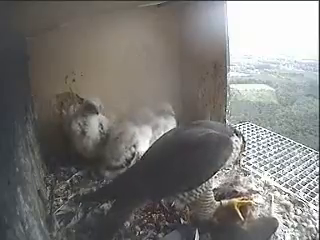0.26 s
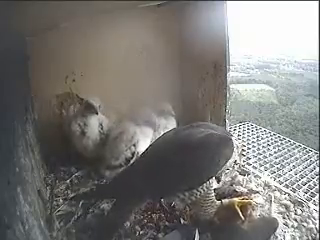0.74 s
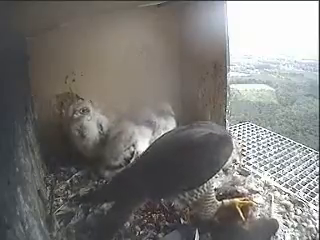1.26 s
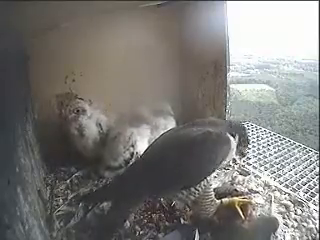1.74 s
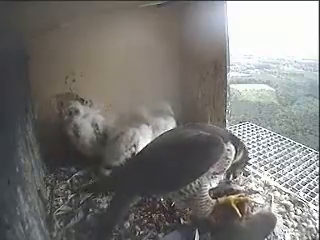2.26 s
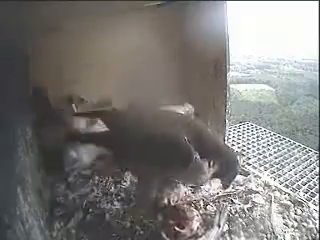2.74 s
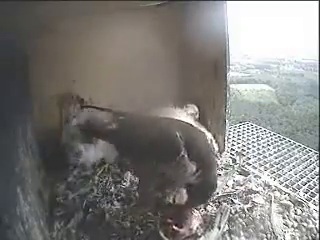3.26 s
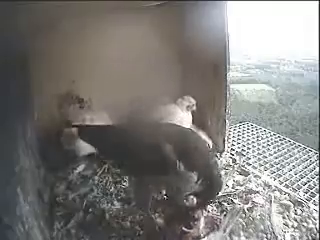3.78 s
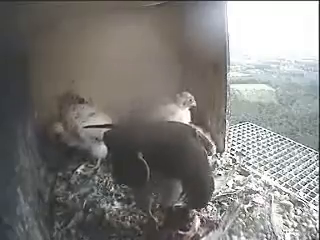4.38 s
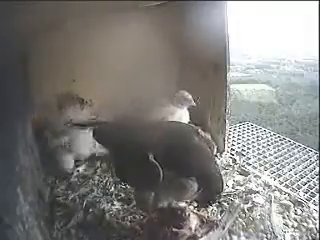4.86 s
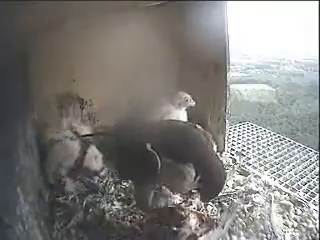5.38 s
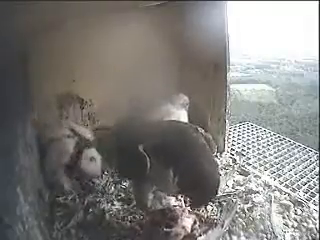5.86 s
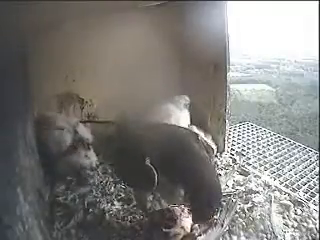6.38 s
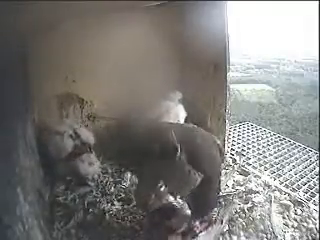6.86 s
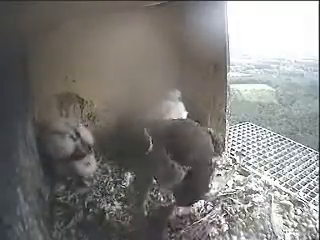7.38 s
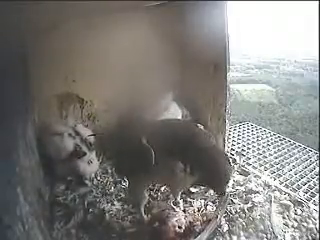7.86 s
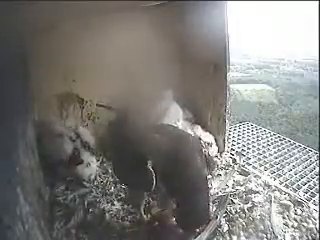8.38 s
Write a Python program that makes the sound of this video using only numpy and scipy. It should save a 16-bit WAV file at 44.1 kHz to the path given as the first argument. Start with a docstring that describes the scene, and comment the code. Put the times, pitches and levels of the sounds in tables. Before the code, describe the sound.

A fixed microphone inside a hollow nest box picks up quiet air, faint electrical hum and high whine. Young falcons cheep, thinly and clearly at first, then harsh and louder in quick runs as the adult feeds. Feet tread and scrape gravel, the beak ticks and snaps, prey bumps the boards. A few low soft peeps slide downward later. Close walls add short flutter and woody resonance; the calls become sparse near the end.

```python
"""Air murmurs in a wooden nest box over a faint electrical hum and whine, and feet shuffle on gravel.
Falcon chicks soon beg: most cheeps start as a rising whistle, break into a hoarse rasp and clear as they fall.
A parent tears at prey: beak and gravel snap as short noise bursts, feet and prey thump on the floor.
Voices are sums of sine waves plus hiss; the rest is shaped noise; resonances and short echoes make the box.
A few soft, low peeps slide down in pitch in the second half."""
import sys
import numpy as np
from scipy import signal
from scipy.fft import rfft, irfft, next_fast_len
from scipy.io import wavfile

SR = 44100
rng = np.random.default_rng(int(sys.argv[2]) if len(sys.argv) > 2 else 0)


def put_to_file(sound):
    """Save the sound as 16-bit audio at rate SR, in the file named by the first command-line argument."""
    columns = np.atleast_2d(sound).T  # one column per channel
    safe = np.clip(columns, -1, 1)
    whole_steps = np.round(safe * 32767)
    wavfile.write(sys.argv[1], SR, whole_steps.astype(np.int16))


N = 380577
T = np.arange(N) / SR  # time in seconds

# hiss of a hoarse throat, as a spectrum shape: frequency_hz, relative_level_db (per Hz)
RASP_SPECTRUM = [(400, -48), (1100, -5.5), (2150, -16.5), (2450, -6.5), (3200, 2), (3550, 0), (4000, 3.5),
                 (5400, -1), (6100, -8.5), (7300, 1.5), (8500, -3), (9700, -2.5), (10700, -28),
                 (13000, -41)]
# hard clack of stones or wood, as a spectrum shape: frequency_hz, relative_level_db (per Hz)
CLACK_SPECTRUM = [(200, -36), (600, -13), (1100, 5), (1900, 1), (3200, 4), (5000, -6), (10000, -18)]
# feet and prey strike the floor: start_s, relative_level_db, hardness_db (clack against thud)
FLOOR_HITS = [(2.707, -44.5, 1), (2.734, -44, -12), (2.782, -51.5, 16.5), (2.882, -37, -18),
              (3.362, -43, -13), (3.774, -50.5, 11), (4.128, -37.5, 0.5), (4.289, -42, -10),
              (4.386, -49, 4.5), (4.638, -39.5, 2), (4.84, -41.5, -12), (4.925, -45, 3), (4.95, -45.5, 6),
              (4.996, -42, 10), (5.172, -38, -14), (5.557, -38, -8.5), (5.868, -28.5, -30),
              (5.899, -47, -23), (6.216, -32.5, -21), (6.658, -41.5, -21), (6.978, -39, 0),
              (7.106, -38.5, -13), (8.002, -45.5, -1), (8.352, -39, -1), (8.469, -45.5, 6.5)]


def amp(db):
    """Turns decibels into an amplitude factor."""
    return 10 ** (np.asarray(db) / 20)


def unit(x):
    """Scales a sound to an average (rms) level of 1."""
    return x / np.sqrt(np.mean(x ** 2) + 1e-20)


def add(mix, s, sound):
    """Adds a sound into the mix at s seconds, cut off at the end of the mix."""
    part = mix[max(round(s * SR), 0):][:len(sound)]
    part += sound[:len(part)]


def bump(t, at_s, width_s):
    """A smooth swell of height 1."""
    return np.exp(-((t - at_s) / width_s) ** 2)


def colour(x, points):
    """Filters x through a curve drawn between (Hz, dB) points, then sets its rms to 1."""
    hz, db = np.transpose(points)
    f = np.fft.rfftfreq(len(x), 1 / SR)
    curve_db = np.interp(np.log(f + 1), np.log(hz), db)
    return unit(irfft(rfft(x) * amp(curve_db), len(x)))


def wander(rate_hz):
    """Random motion of rms 1, mostly slower than rate_hz."""
    size = next_fast_len(N)
    f = np.fft.rfftfreq(size, 1 / SR)
    smoothed = rfft(rng.standard_normal(size)) / np.sqrt(1 + (f / rate_hz) ** 4)
    return unit(irfft(smoothed, size)[:N])


def noise(points):
    """Steady noise with a given spectrum, as long as the scene."""
    return colour(rng.standard_normal(next_fast_len(N)), points)[:N]


def grains(points, per_s, spread_db):
    """Many tiny impacts of uneven size at random moments."""
    size = next_fast_len(N)
    hits = (rng.random(size) < per_s / SR) * rng.choice([-1, 1], size)
    sizes_db = spread_db * np.minimum(rng.exponential(1, size), 4)
    return colour(hits * amp(sizes_db), points)[:N]


def burst(source, s, decay_s, rise_s):
    """A piece of noise that swells quickly and dies away."""
    t = T[:SR // 8]
    return source[round(s * SR):][:len(t)] * (1 - np.exp(-t / rise_s)) * np.exp(-t / decay_s)


def box(x):
    """The air and boards of the box ring at their own pitches, with dips between them."""
    # resonances of the box: centre_hz, width_hz, ring_level_db (over the direct sound)
    modes = [(90.7, 25, 12.5), (218.8, 33.7, 10), (252.4, 10.6, 11.5), (670.3, 25.5, 13.5), (968, 45, 8.5),
             (1131, 76, 9), (1260, 31, 6), (1576, 36, 5.5), (1899, 57, 8.5), (2380, 8.3, -14),
             (2633, 47, 3.5), (3000, 60, -30), (3836, 18, 3.5), (4214, 98, -1.5), (4994, 32, -7),
             (5057, 82, 1), (5285, 28, 7)]
    # places where wall echoes cancel at the microphone: centre_hz, width_hz, depth_db
    dips = [(1368, 100, -4.5), (1612, 54, -11.5), (2180, 112, -14.5), (5900, 250, -2.5)]
    out = x.copy()
    for hz, width, db in modes:
        out += amp(db) * signal.lfilter(*signal.iirpeak(hz, hz / width, SR), x)
    for hz, width, db in dips:
        out += (amp(db) - 1) * signal.lfilter(*signal.iirpeak(hz, hz / width, SR), out)
    return out


def walls(x, wet_db=-6, t60=0.11):
    """Close walls throw back a short dense flutter of echoes that fades by 60 dB in t60 seconds."""
    t = T[:SR // 5]
    signs = rng.choice([-1, 1], len(t))
    chosen = rng.random(len(t)) < 1 / 10
    taps = signs * chosen * (t > .0015) * amp(-60 * t / t60)  # no echo in the first 1.5 ms
    echoes = signal.oaconvolve(x, taps / np.linalg.norm(taps))[:N]
    return (x + amp(wet_db) * echoes) / np.hypot(1, amp(wet_db))


def outside(level_db=-60, swell_db=1):
    """Distant air sounds in the hollow of the box: shaped noise that slowly swells and sinks."""
    # outside air and hiss, as a spectrum shape: frequency_hz, relative_level_db (per Hz)
    air_spectrum = [(15, 10.5), (45, 5), (130, -12), (330, -17.5), (800, -15), (1500, -17), (2200, -18),
                    (2600, -14), (4200, -17.5), (6000, -21), (10400, -46), (11000, -33), (13000, -43)]
    return amp(level_db) * unit(box(noise(air_spectrum))) * amp(swell_db * wander(2.2))


def shuffling(tread_db=1, scrape_db=8, lumps_db=1.5, steps_db=1.57, steps_hz=5):
    """Feet work the floor while gravel and feathers scrape, in uneven steps and more after each knock."""
    # how busily the parent shuffles: time_s, weight_db (on the floor), scraping_db (both before a trim)
    activity = [(0.0, -59, -78), (0.45, -63, -81), (0.72, -62, -86), (2.68, -60.5, -82),
                (2.85, -55.5, -63.5), (3.16, -57.5, -81), (3.57, -54.5, -67.5), (4.07, -54.5, -74.5),
                (4.31, -51, -63), (4.5, -53.5, -65.5), (5.01, -49.5, -62.5), (5.27, -54, -69.5),
                (6.49, -55.5, -70.5), (7.02, -51.5, -66), (7.66, -56, -76), (7.88, -55.5, -64),
                (8.12, -59, -81.5), (8.6, -56.5, -80)]
    # feet on the floor, as a spectrum shape: frequency_hz, relative_level_db (per Hz)
    tread_spectrum = [(25, -18), (90, 1.5), (200, 8), (330, -4), (600, -1.5), (1200, -16), (2000, -19.5),
                      (4000, -25.5)]
    # gravel and feathers, as a spectrum shape: frequency_hz, relative_level_db (per Hz)
    scrape_spectrum = [(300, 5), (1200, -3.5), (2200, 0.5), (2700, 2), (5000, -1.5), (7200, 3.5),
                       (10200, 5.5), (11200, -8.5), (13000, -10)]
    # each knock stirs the litter, which takes a moment to settle
    stir_rise_s, stir_fall_s, stir_tread_db, stir_scrape_db = .012, 0.029, -12.5, -20
    s, weight_db, gravel_db = np.transpose(activity)
    stir, t = np.zeros(N), T[:SR // 2]
    for knock_s, db, _ in FLOOR_HITS:
        add(stir, knock_s, amp(db) * (1 - np.exp(-t / stir_rise_s)) * np.exp(-t / stir_fall_s))
    tread = unit(box(grains(tread_spectrum, per_s=700, spread_db=2.0)))
    scrape = box(grains(scrape_spectrum, per_s=3700, spread_db=-3.5))
    scrape = unit(scrape * amp(lumps_db * wander(25)))
    weight = np.hypot(amp(np.interp(T, s, weight_db) + tread_db), amp(stir_tread_db) * stir)
    gravel = np.hypot(amp(np.interp(T, s, gravel_db) + scrape_db), amp(stir_scrape_db) * stir)
    return (tread * weight + scrape * gravel) * amp(steps_db * wander(steps_hz))


def whistle(phase, dull_db=0):
    """The clear voice: a few harmonics, each dull_db weaker than usual against the one below."""
    # lines of the voice: multiple_of_pitch, relative_level_db
    partials = [(1, -4.5), (2, -8.5), (3, -11.5), (4, -43)]
    return sum(amp(db - dull_db * (k - 2)) * np.sin(round(k) * phase) for k, db in partials)


def cheep_pitch(t, left, first_hz, top_hz, whistle_s):
    """The pitch in Hz rises toward a top, then drops toward a closing pitch shared by all cheeps."""
    rise_s, fall_s, last_hz, creep_per_s = .03, 0.02, 2405, .3
    rise = (first_hz - top_hz) * np.exp(-t / rise_s)
    fall = (last_hz - top_hz) * np.exp(-left / fall_s)
    # a long whistle creeps upward
    return (top_hz + rise + fall) * (1 - creep_per_s * np.maximum(whistle_s - t, 0))


def chicks(break_s=0.018, breath_db=-27, flutter_db=3, sag=.035, climb=0.19, climb_s=0.032,
           choke_db=-9.0, split_db=1.5, break_share=0.32):
    """Each cheep arches in pitch; pushed hard, the syrinx jitters, splits into two tones and hisses."""
    # one row a cheep: start_s, end_s, first_hz, top_hz, whistle_s (clear before the break),
    # roughness (about 0.6 to 1.1), level_db (before effort and mix), push_at_s (time in the scene),
    # push_db, flare_db (closing swell or, if negative, dip), treble_db (boost or cut)
    cheep_rows = [ (0.22, 0.48, 2080, 2544, 0.026, .6, -55.5, .37, 1, 1, 1),
                  (.608, 0.967, 2280, 2845, 0.19, 0.91, -57, .705, 3, 4, -3),
                  (1.096, 1.22, 2350, 3110, 0.035, 0.77, -58, 1.17, 2.5, 7, -0.5),
                  (1.302, 1.406, 2420, 3060, 0.036, 0.85, -57, 1.37, 2, 5.5, -0.5),
                  (1.511, 1.647, 2400, 3014, 0.038, 0.86, -55.5, 1.59, 1.5, 3, -1.5),
                  (1.82, 2, 2450, 3105, 0.034, 0.8, -56, 1.92, 2, 9, 2.5),
                  (2.13, 2.257, 2420, 3110, .038, 0.75, -55.5, 2.23, 2, 4, -0.5),
                  (2.379, 2.498, 2450, 3070, 0.027, 0.81, -57, 2.45, 4, 2, 0),
                  (2.63, 2.79, 2420, 2722, 0.024, 0.67, -57.5, 2.757, 19.5, 3.5, .5),
                  (3.345, 3.458, 2350, 2784, .021, .87, -51, 3.385, 5.5, -1.5, -3),
                  (3.577, 3.674, 2400, 2740, 0.0063, .89, -56.5, 3.63, 6, -0.5, 4.5),
                  (3.716, 3.781, 2450, 2650, .006, 0.89, -55, 3.745, 5.5, -2.5, 0),
                  (4.125, 4.246, 2550, 2724, .003, 1.1, -50.5, 4.21, 0.5, 5, 4),
                  (4.419, 4.52, 2450, 2860, 0.0068, 0.92, -56.5, 4.478, 10, -3, -1),
                  (4.644, 4.901, 2450, 3045, .011, 1.06, -45.5, 4.69, 1.5, -12, -3),
                  (5.006, 5.155, 2450, 2720, 0.0044, 0.95, -46, 5.06, 2.5, -4.5, -3),
                  (5.253, 5.467, 2480, 2683, 0.0099, 0.84, -51, 5.355, 10.5, -4.5, -1.5),
                  (5.566, 5.913, 2400, 2738, 0.01, 0.76, -48.5, 5.65, 7, -2, -3),
                  (5.877, 6.088, 2450, 2570, .005, .72, -47.5, 5.99, 2.5, 6.5, -0.5),
                  (6.136, 6.421, 2454, 2864, 0.05, 0.66, -50.5, 6.32, 8.5, 10.5, -2.5),
                  (6.457, 6.594, 2380, 3016, .04, .63, -51.5, 6.56, 3, 6.5, -1),
                  (6.588, 6.718, 2550, 2820, .003, 0.71, -52, 6.65, 6, 10, -0.5),
                  (6.714, 6.864, 2450, 3003, 0.036, 0.6, -49, 6.77, 4.5, 6.5, -1.5),
                  (6.872, 6.941, 2500, 2610, 0.0058, 0.7, -50.5, 6.895, 7.5, 2, -2),
                  (6.943, 7.007, 2500, 2687, 0.0086, 0.64, -51, 6.995, 9.5, 3.5, 1.5),
                  (7.571, 7.677, 2350, 2786, 0.014, 0.79, -52, 7.6, 3.5, -6, 2.5),
                  (7.809, 7.892, 2450, 2750, 0.0038, 0.92, -56.5, 7.85, 3.5, -2, 3.5),
                  (7.938, 8.003, 2450, 2640, 0.0034, 0.91, -58, 7.96, 5.5, -1.5, -1.5),
                  (8.352, 8.477, 2500, 2665, 0.0021, 1.03, -50, 8.44, 2.5, -5, 2.5)]
    # second tone and its sums with the first: multiple_of_pitch_added, relative_level_db
    split_partials = [(0, -9.5), (1, -13), (2, -18.5)]
    # a higher cheep has a higher, stronger second tone and a steadier pitch
    usual_top_hz, base_second_hz, second_follows, second_hz_per_db = 2792, 4188, .35, 114
    usual_warble, warble_fade_hz = 0.0202, 425  # warble as a share of pitch
    # loud cheeps never come fully clear: they keep a share of the rasp
    clear_below_db, rasp_share_per_db, most_rasp_share = -56, .11, .52
    rasp_db, end_rough, clear_s = -8.5, .25, .032
    closing_strain, strain_dull_db = .7, 3
    # effort: an accent on the opening whistle, one broad push, a flare just before the beak shuts
    accent_db, accent_at_s, accent_width_s = 2, 0.017, 0.021
    push_width_s, flare_before_end_s, flare_width_s = 0.044, 0.017, 0.016
    throb_db, throb_hz, gate_s = 1.0, 11, 0.01
    full_voice_hz, weak_hz_per_db = 2504, 51  # the voice weakens below this pitch

    out = np.zeros(N)
    jitter, second_jitter = .12 * wander(300), .033 * wander(300)
    slow, flutter, throb, hiss = wander(50.5), wander(62), wander(throb_hz), noise(RASP_SPECTRUM)
    for (start, end, first_hz, top_hz, whistle_s, roughness, level_db,
         push_at, push_db, flare_db, treble_db) in cheep_rows:
        at = slice(round(start * SR), round(end * SR))
        t, left = T[at] - start, np.maximum(end - T[at], 0)
        pitch = cheep_pitch(t, left, first_hz, top_hz, whistle_s)

        # the voice breaks after the whistle and clears as the pressure drops, unless it is very hoarse
        strain = np.clip((level_db - clear_below_db) * rasp_share_per_db, 0, most_rasp_share)
        closing = end_rough + closing_strain * strain + roughness ** 8
        held = np.clip(closing + (left / clear_s) ** 3 / 2, 0, 1)
        breaking = np.clip((t - whistle_s) / (break_s + break_share * whistle_s) + .5, 0, 1)
        broken = breaking * held
        rough = np.clip(roughness, 0, 1) * (broken + strain * (1 - broken))

        # roughness shakes the pitch and pulls it down
        warble = usual_warble * np.exp((usual_top_hz - top_hz) / warble_fade_hz)
        shake = rough ** 2 * jitter[at] + warble * np.maximum(broken, strain) * slow[at]
        phase = 2 * np.pi * np.cumsum(pitch * (1 + shake - sag * rough)) / SR

        # a second vibration climbs after the break and takes power from the first
        still_low = climb * min(whistle_s / break_s, 1) * np.exp(-np.maximum(t - whistle_s, 0) / climb_s)
        arch = np.sqrt(pitch / top_hz) * (1 - still_low)
        second_hz = base_second_hz * (top_hz / usual_top_hz) ** second_follows * arch
        second_phase = 2 * np.pi * np.cumsum(second_hz * (1 + roughness * second_jitter[at])) / SR
        split = sum(amp(db) * np.sin(second_phase + round(k) * phase) for k, db in split_partials)
        split = split * amp((top_hz - usual_top_hz) / second_hz_per_db)

        # clear tone, second tone and hiss together, fluttering where the voice is rough
        voice = whistle(phase, strain_dull_db * strain) * amp(choke_db * rough)
        voice = voice + np.sqrt(2) * rough ** 2 * split * amp(split_db + choke_db * rough ** 2)
        voice = voice + (amp(rasp_db) * np.sqrt(2) * rough ** 2 + amp(breath_db)) * hiss[at]
        voice = unit(voice * amp(flutter_db * rough * flutter[at]))
        # a wider gape lets out more treble
        treble = signal.filtfilt(*signal.butter(2, 6000, "high", fs=SR), voice)
        voice = voice + (amp(treble_db) - 1) * treble

        effort_db = level_db + accent_db * (1 - broken) * bump(t, accent_at_s, accent_width_s)
        effort_db = effort_db + push_db * bump(T[at], push_at, push_width_s)
        effort_db = effort_db + flare_db * bump(left, flare_before_end_s, flare_width_s)
        effort_db = effort_db + throb_db * rough * throb[at]
        effort_db = effort_db - np.maximum(full_voice_hz - pitch, 0) / weak_hz_per_db
        gate = np.clip(np.minimum(t, left) / gate_s, 0, 1)  # soft start and end
        add(out, start, voice * gate * amp(effort_db))
    return out


def ticks(level_db=-3, decay_s=0.0049, clack_db=-10):
    """Beak and gravel snap: short bright noise bursts, each with some woody body under it."""
    # snaps: time_s, relative_level_db, body_db (low-mid body against the treble, before a trim)
    snap_rows = [(1.0854, -46, -16), (1.7145, -54, -8), (1.9624, -36.5, -1), (2.1312, -40, -4),
                 (2.6666, -41, 2), (2.71, -45, 2), (2.878, -28, -0.5), (3.116, -45.5, -6), (3.325, -41, -7),
                 (3.49, -40.5, 1), (3.777, -32.5, -9), (3.8266, -40.5, 4), (4.1211, -31, -20),
                 (4.135, -26.5, -31), (4.2961, -34.5, -13), (4.3777, -34, -17), (4.999, -37.5, -10),
                 (5.466, -42.5, -10), (5.5562, -36.5, -13), (5.855, -34, -19), (7.044, -40, 3.5),
                 (7.086, -34.5, -16), (7.1036, -31, 0), (7.313, -38, -13), (7.45, -38, -3),
                 (7.614, -35.5, -23), (7.9958, -36, 6), (8.3413, -36, 1), (8.3567, -29, -19)]
    # bright part of a snap, as a spectrum shape: frequency_hz, relative_level_db (per Hz)
    snap_spectrum = [(500, -1.5), (2000, -29.5), (4500, -14.5), (6000, -2.5), (7100, 1), (8200, -3),
                     (10200, 3.5), (11000, -11), (12500, -10)]
    out, snap, clack = np.zeros(N), noise(snap_spectrum), noise(CLACK_SPECTRUM)
    rise_s = .0025
    for s, db, body_db in snap_rows:
        bright = burst(snap, s, decay_s, rise_s)
        body = amp(body_db + clack_db) * burst(clack, s, decay_s, rise_s)
        add(out, s - rise_s / 2, amp(db + level_db) * (bright + body))
    return out


def knocks(thud_db=-1, clack_db=-11, decay_s=0.015, rise_s=0.00024, push_s=0.00048,
           settle_db=-13, settle_s=0.029):
    """A soft push on the boards and a low settling noise, with a clack of stones on top."""
    # low settling noise, as a spectrum shape: frequency_hz, relative_level_db (per Hz)
    thud_spectrum = [(30, -18), (100, -4), (200, 13), (300, 7.5), (450, -41), (900, -43), (2500, -43)]
    out, clack, settle = np.zeros(N), noise(CLACK_SPECTRUM), noise(thud_spectrum)
    u = T[:SR // 8] / push_s
    push = u * (2 - u) * np.exp(-u)  # the boards give, then spring back
    for s, db, hard_db in FLOOR_HITS:
        thud = push + amp(settle_db) * burst(settle, s, settle_s, rise_s)
        stones = amp(clack_db + hard_db) * burst(clack, s, decay_s, rise_s)
        add(out, s, amp(db) * (amp(thud_db) * thud + stones))
    return out


def peeps(attack_s=0.0077, release_s=0.017, fade_db=-5, waver=0.024, jitter=0.039, hiss_db=-5):
    """Short soft notes of the same voice that slide down and fade."""
    # one row a peep: start_s, end_s, first_hz, last_hz, level_db (before fade and mix), roughness (0-1)
    peep_rows = [(4.276, 4.438, 2400, 2090, -57, 0.3), (7.085, 7.217, 1984, 1853, -62, 0.23),
                 (8.482, 8.521, 2130, 1910, -56, 0.65), (8.541, 8.584, 2240, 1825, -52.5, 0.73)]
    out, slow, fast, hiss = np.zeros(N), wander(62), wander(300), noise(RASP_SPECTRUM)
    for start, end, first_hz, last_hz, level_db, roughness in peep_rows:
        at = slice(round(start * SR), round(end * SR))
        t, left = T[at] - start, end - T[at]
        done = t / (end - start)  # 0 at the start of the note, 1 at its end
        shake = waver * slow[at] + jitter * roughness * fast[at]
        hz = (first_hz + (last_hz - first_hz) * done) * (1 + shake)
        tone = whistle(2 * np.pi * np.cumsum(hz) / SR)
        voice = unit(tone + amp(hiss_db) * roughness * hiss[at])
        gate = np.clip(np.minimum(t / attack_s, left / release_s), 0, 1)
        add(out, start, voice * gate * amp(level_db + fade_db * done))
    return out


def scene(chicks_db=-2):
    """Everything sounds inside the box; voices and snaps also echo off its walls."""
    voices = amp(chicks_db) * (chicks() + peeps())
    echoing = walls(voices + ticks())
    nest = box(echoing + knocks()) + shuffling() + outside()
    return np.array([nest, nest])


def record(dry):
    """One microphone on both channels, electrical lines, a constant offset and a treble limit."""
    # electrical hum and whine: frequency_hz, level_db (rms)
    electrical_lines = [(120, -81), (360, -81.5), (8000, -76.5)]
    cut_hz = 12850
    hum = sum(amp(db) * np.sqrt(2) * np.sin(2 * np.pi * hz * T) for hz, db in electrical_lines)
    offset = np.array([[.0115], [.0076]])  # one value a channel
    lowpass = signal.firwin(511, cut_hz, window=("kaiser", 9), fs=SR)
    return signal.oaconvolve(dry + hum, lowpass[None], "same") + offset


dry = scene()
out = record(dry)
put_to_file(out)
```